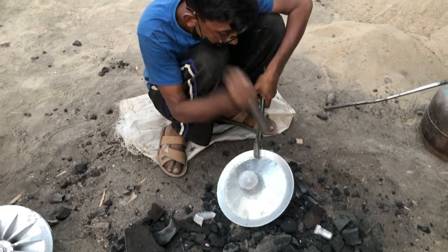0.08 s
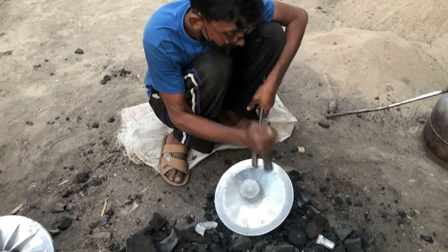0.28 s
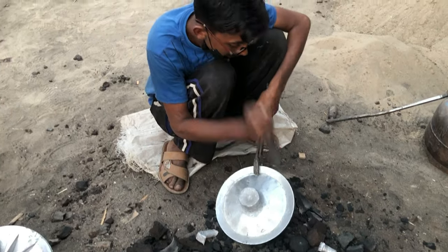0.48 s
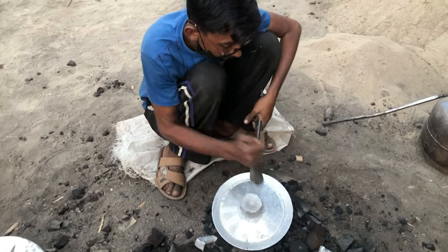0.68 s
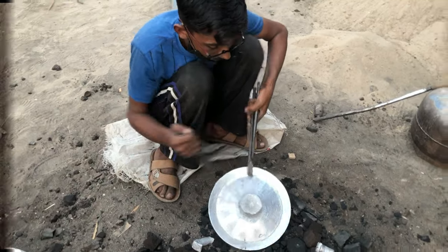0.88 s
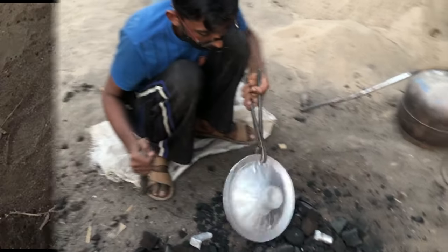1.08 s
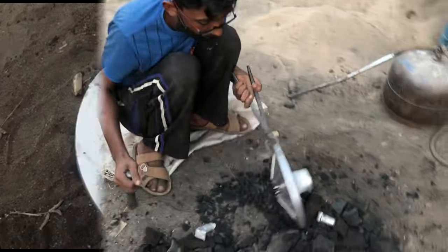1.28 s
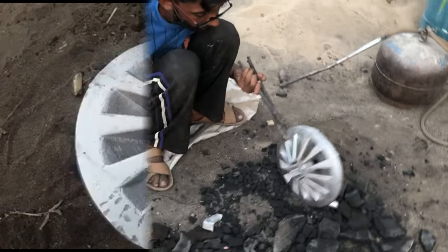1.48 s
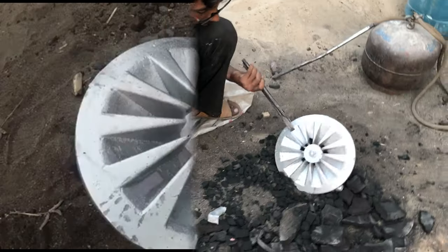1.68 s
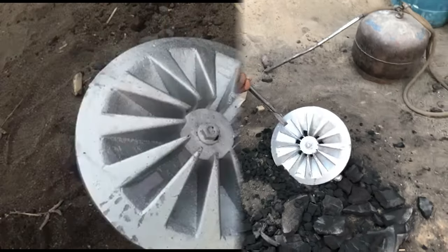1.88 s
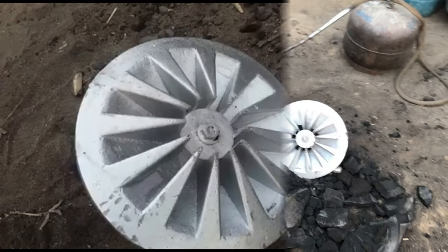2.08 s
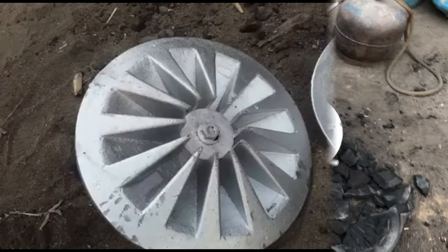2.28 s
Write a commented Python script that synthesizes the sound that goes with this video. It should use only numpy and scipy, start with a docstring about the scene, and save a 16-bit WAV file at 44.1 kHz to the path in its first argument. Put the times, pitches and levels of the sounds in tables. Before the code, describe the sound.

Two hard, bright metallic strikes on a finned aluminium casting, each with a short ring and rattle, over steady blower roar and hiss; then small coal clinks and gritty scuffs in an open yard, close microphone.

```python
"""A furnace blower roars and hisses in an open yard, then fades into duller air noise.
Over it a steel bar strikes a finned aluminium casting twice: crack, ringing modes, rattle, wall echoes.
Coals clink as single decaying modes; the casting scuffs gritty ground as short noise bursts.
A fast gain control ducks everything at each blow."""
import sys
import numpy as np
from scipy import signal
from scipy.fft import rfft, irfft
from scipy.io import wavfile
from scipy.ndimage import uniform_filter1d, map_coordinates

SR = 44100
rng = np.random.default_rng(int(sys.argv[2]) if len(sys.argv) > 2 else 0)


def wrap_up_sound(samples):
    """Save the sound to the file named by the first command line argument, as 16-bit audio."""
    columns = np.atleast_2d(samples).T
    # keep every value between -1 and 1, then stretch to whole-number steps
    tamed = np.clip(columns, -1, 1)
    steps = np.round(tamed * 32767).astype(np.int16)
    wavfile.write(sys.argv[1], SR, steps)


def amplitude_ratio(level_db):
    """Convert a level in decibels to the matching linear amplitude (field) ratio."""
    exponent = np.asarray(level_db, float) / 20
    return 10 ** exponent


N = 105840  # samples, 2.4 s


def unit(x):
    """Scales to rms 1."""
    return x / np.sqrt(np.mean(x ** 2) + 1e-20)


def along(points, hz):
    """Interpolates (Hz, value) points on a log frequency axis."""
    point_hz, value = np.transpose(points)
    return np.interp(np.log(hz + 1), np.log(point_hz + 1), value)


def curve(rows):
    """Interpolates (s, value) rows to one value per sample."""
    row_s, value = np.transpose(rows)
    return np.interp(np.arange(N) / SR, row_s, value)


def wobble(rate_hz):
    """Smooth random curve with rate_hz knots a second."""
    knots = rng.standard_normal(int(N * rate_hz / SR) + 4)
    return map_coordinates(knots, [np.arange(N) * rate_hz / SR])


def coloured(size, gain):
    """Noise of rms 1, shaped by a gain over frequency."""
    spectrum = rfft(rng.standard_normal(size))
    return unit(irfft(spectrum * gain(np.fft.rfftfreq(size, 1 / SR)), size))


def rush(spectrum, patchy_db):
    """Steady noise with time-frequency patches of random gain, rms 1."""
    noise = coloured(N + 1024, lambda hz: amplitude_ratio(along(spectrum, hz)))
    z = signal.stft(noise, nperseg=512)[2]
    field = uniform_filter1d(rng.standard_normal(z.shape), size=6, axis=0)
    field = uniform_filter1d(field, size=10, axis=1)
    patched = signal.istft(z * amplitude_ratio(patchy_db * unit(field)), nperseg=512)[1]
    return unit(patched[:N])


# flame roar level: time_s, level_db
ROAR_LEVEL = [(0.0, -35), (0.15, -34.5), (0.29, -36.5), (0.86, -37), (1.32, -33), (1.94, -36.5),
              (2.03, -35.5), (2.24, -39.5), (2.4, -47)]
# flame roar spectrum: freq_hz, relative_db (per Hz)
ROAR_SPECTRUM = [(15, -68), (25, -40), (70, -8.5), (113, -8.5), (194, -0.5), (271, -1.5), (339, -11.5),
                 (448, -22), (494, -16.5), (700, -21.5), (910, -42), (1540, -120)]


def flame_roar():
    """Low combustion noise with a lumpy level."""
    level_db = curve(ROAR_LEVEL) + 0.54 * wobble(25.23)
    return amplitude_ratio(level_db) * rush(ROAR_SPECTRUM, patchy_db=-0.3)


# blower hiss level: time_s, level_db
HISS_LEVEL = [(0.0, -44.5), (0.14, -44), (0.45, -43), (1.04, -43.5), (1.28, -42.5), (1.84, -42),
              (2.08, -45.5), (2.4, -53)]
# blower hiss spectrum: freq_hz, relative_db (per Hz)
HISS_SPECTRUM = [(350, 0), (600, -3.5), (758, -5), (1030, -6), (1160, -9), (1230, -10), (1330, -8),
                 (1640, -7.5), (2310, -7.5), (2570, -5.5), (3430, -14.5), (4910, -16.5), (5710, -10.5),
                 (7020, -18.5), (7620, -18.5), (13000, -32.5), (16000, -39)]


def air_hiss():
    """Broad turbulent noise of the blown air."""
    level_db = curve(HISS_LEVEL) + 0.38 * wobble(7.57)
    return amplitude_ratio(level_db) * rush(HISS_SPECTRUM, patchy_db=0.75)


# air in a quieter corner of the yard: freq_hz, relative_db (per Hz)
AIR_SPECTRUM = [(200, -21), (400, 11), (900, 2), (1500, -3), (3000, -12), (6000, -30), (12000, -39)]


def yard_air():
    """Dull air noise that comes up late, as roar and hiss fade."""
    level_db, from_s, full_s = -48, 2, 2.02
    fade_in = curve([(from_s, 0), (full_s, 1)])
    return amplitude_ratio(level_db) * fade_in * rush(AIR_SPECTRUM, patchy_db=1.5)


# small coal clinks: start_s, level_db, pitch_hz, t60_s
CLINKS = [(1.075, -36.5, 2870, 0.061), (1.084, -39.5, 8750, 0.043), (1.13, -56, 10600, .05),
          (1.66, -53, 12500, .06), (1.952, -43, 3000, .04), (1.96, -34.5, 1930, 0.04),
          (2.04, -35.5, 873, .06), (2.146, -37, 1030, 0.12), (2.223, -41.5, 4750, 0.066),
          (2.223, -42, 5780, .04), (2.224, -46, 8460, 0.045), (2.226, -44.5, 9300, 0.056),
          (2.33, -39.5, 1350, 0.13), (2.35, -39, 851, 0.13)]


def coal_clinks():
    """Each clink is one exponentially decaying mode."""
    attack_s = 0.0021
    out, t = np.zeros(N + SR), np.arange(SR // 4) / SR
    for start_s, level_db, pitch_hz, t60_s in CLINKS:
        envelope = amplitude_ratio(level_db - 60 * t / t60_s) * (1 - np.exp(-t / attack_s))
        out[round(start_s * SR):][:len(t)] += envelope * np.sin(2 * np.pi * pitch_hz * t)
    return out[:N]


# scuffs on grit: start_s, length_s, level_db, centre_hz
SCUFFS = [(0.205, 0.0091, -40.5, 3960), (1.055, 0.1, -49.5, 4050), (1.127, 0.061, -43.5, 830),
          (1.166, 0.13, -56, 8900), (1.17, 0.077, -45.5, 2200), (1.899, 0.053, -42, 1850),
          (1.944, 0.045, -43, 2720), (2.024, .04, -46.5, 980), (2.07, 0.036, -55, 1100),
          (2.105, 0.11, -41.5, 874), (2.2193, .03, -45, 5400), (2.22, 0.033, -46.5, 2800),
          (2.224, 0.094, -43, 1410), (2.24, .06, -52.5, 6600), (2.322, 0.061, -48, 1200)]


def grit_scuffs():
    """Sliding contact: short band-limited noise bursts with a grainy level."""
    width_octaves, top_hz, grit_db, grit_hz = 0.67, 10600, 3, 401
    out, t = np.zeros(N + SR), np.arange(SR // 4) / SR
    for start_s, length_s, level_db, centre_hz in SCUFFS:
        def band(hz):
            octaves = np.log2((hz + 1) / centre_hz)
            return np.exp(-.5 * (octaves / width_octaves) ** 2 - (hz / top_hz) ** 4)

        u = t / length_s
        grit = coloured(len(t), band) * amplitude_ratio(grit_db * wobble(grit_hz)[:len(t)])
        envelope = (1 - np.exp(-u / 0.093)) * np.exp(-3 * u ** 2)
        out[round(start_s * SR):][:len(t)] += amplitude_ratio(level_db) * envelope * grit
    return out[:N]


# diffuse yard decay: freq_hz, t60_s
YARD_DECAY = [(500, 0.6), (2000, 0.56), (10000, 0.17)]
# wall echoes: delay_s, level_db
WALLS = [(0.0273, -13.5), (.05, -24)]


def yard(x):
    """Adds smeared, dull wall echoes and a diffuse tail, each frequency dying at its own speed."""
    tail_db, tail_from_s = -17, 0.013
    wall_smear_s, wall_top_hz = 0.0018, 7100
    hz, t, z = signal.stft(rng.standard_normal(SR // 2), SR, nperseg=256)
    decay = amplitude_ratio(-60 * t / along(YARD_DECAY, hz)[:, None])
    tail = signal.istft(z * decay, SR, nperseg=256)[1]
    tail = amplitude_ratio(tail_db) * tail / np.linalg.norm(tail)
    tail = np.pad(tail, (round(tail_from_s * SR), 0))
    t = np.arange(SR // 20) / SR
    for delay_s, level_db in WALLS:
        echo = coloured(len(t), lambda hz: 1 / (1 + (hz / wall_top_hz) ** 2))
        echo *= np.exp(-t / wall_smear_s)
        tail[round(delay_s * SR):][:len(t)] += amplitude_ratio(level_db) * echo / np.linalg.norm(echo)
    return x + signal.fftconvolve(x, tail)[:len(x)]


# fins and grit shaking: freq_hz, relative_db (per Hz)
RATTLE_SPECTRUM = [(300, -16), (500, -8.5), (750, 0), (1300, -6), (2500, -1), (4300, -6.5), (6200, -14.5),
                   (8000, -11.5), (12500, -19.5), (15500, -39), (17000, -60)]


def rattle(t, fins_db):
    """Dying noise of shaking fins and grit, passed through many small fin modes."""
    level_db, t60_s, fin_spacing_hz = -14.5, 0.13, 45

    def fin_gain(hz):
        peaks_db = np.interp(hz / fin_spacing_hz, np.arange(len(fins_db)), fins_db)
        return amplitude_ratio(along(RATTLE_SPECTRUM, hz) + peaks_db)

    envelope = amplitude_ratio(level_db - 60 * t / t60_s + 3.8 * wobble(321)[:len(t)])
    return envelope * coloured(len(t), fin_gain)


# impact crack: freq_hz, relative_db (per Hz)
CRACK_SPECTRUM = [(240, -64), (400, -5), (1270, 3), (1760, -15), (3120, -4.5), (4380, -1), (5270, 0.5),
                  (6640, -32), (11000, -14), (16000, -34)]


def crack(t):
    """Short broadband contact noise."""
    level_db, t60_s, rise_s = -11.5, 0.031, 0.0018
    envelope = amplitude_ratio(level_db - 60 * t / t60_s) * (1 - np.exp(-t / rise_s))
    return envelope * coloured(len(t), lambda hz: amplitude_ratio(along(CRACK_SPECTRUM, hz)))


# casting and bar modes: pitch_hz, t60_s, first_spot_db, second_spot_db (relative)
METAL_MODES = [(668, .09, -27, -30), (1306, 0.13, -27, -12.5), (1772, 0.26, -10, -9),
               (1800.5, 0.16, 0, 1.5), (1789, 1.1, -28.5, -23), (1802, 0.97, -28, -17.5),
               (1866, 0.13, -10.5, -5), (2508, 0.26, -11, -9.5), (2550, 0.93, -22.5, -23.5),
               (2725, 0.067, -9, -11), (3543, 0.15, -6, -12), (3582, 0.63, -28, -27),
               (3666, 0.11, -10, -14), (4190, 0.26, -16, -26), (4296, 0.11, -5.5, -9.5),
               (4560, .1, -11, -21), (5145, 0.12, -7, -11), (5060, .09, -29, -28), (5640, 0.11, -19, -28),
               (7400, 0.19, -30, -19), (7580, 0.17, -37, -19.5), (8651, 0.14, -21, -14),
               (10890, 0.16, -16.5, -10), (12000, .1, -18, -26), (12700, 0.066, -35, -15.5)]


def metal_ring(t, spot):
    """Decaying modes, weighted by the spot struck; each wavers as the casting rocks on loose coals."""
    ring_db, attack_s = -16, 0.0011
    burst_db, burst_t60_s = 6.5, 0.062  # louder start while the bar is in contact
    rough, rough_hz = .7, 65
    knot = np.arange(100)
    ring = np.zeros(len(t))
    for pitch_hz, t60_s, *spot_db in METAL_MODES:
        knots = rng.standard_normal((2, 100)) * np.minimum(knot, 1)  # waver starts from zero
        in_phase, quadrature = [rough * np.interp(t * rough_hz, knot, k) for k in knots]
        phase = 2 * np.pi * (pitch_hz * t + rng.random())
        wavering = (1 + in_phase) * np.sin(phase) + quadrature * np.cos(phase)
        ring += amplitude_ratio(spot_db[spot] - 60 * t / t60_s) * wavering
    burst = 1 + amplitude_ratio(burst_db - 60 * t / burst_t60_s)
    return ring * amplitude_ratio(ring_db) * (1 - np.exp(-t / attack_s)) * burst


# bar blows, one per spot: start_s, level_db
BLOWS = [(.2266, 0.5), (.6062, -1.65)]


def bar_blows():
    """Each blow sums ring, crack and rattle, and the yard answers; both blows share the fin modes."""
    size = SR * 3 // 4
    out, t = np.zeros(N + size), np.arange(size) / SR
    fins_db = 3.5 * rng.standard_normal(1000)
    for spot, (start_s, level_db) in enumerate(BLOWS):
        blow = metal_ring(t, spot) + crack(t) + rattle(t, fins_db)
        out[round(start_s * SR):][:size] += amplitude_ratio(level_db) * yard(blow)
    return out[:N]


def scene():
    """All sources at one microphone."""
    background = flame_roar() + air_hiss() + yard_air()
    ground = coal_clinks() + grit_scuffs()
    return (background + ground + bar_blows())[None]


def low_pass(x):
    """Removes everything above the highest recorded frequency."""
    return signal.sosfilt(signal.butter(12, 16510, fs=SR, output="sos"), x)


def record(dry):
    """Gain control from the lagging power, a soft ceiling, then the band limits."""
    duck_from_db, duck_slope, duck_lag_s = -20, 1.15, .0045  # slope: dB cut per dB over
    ceiling, low_cut_hz, top_hz = .9, 46, 15900
    pole = np.exp(-1 / (duck_lag_s * SR))
    power = signal.lfilter([(1 - pole) ** 2], [1, -2 * pole, pole ** 2], dry ** 2)
    over_db = np.maximum(10 * np.log10(np.abs(power) + 1e-12) - duck_from_db, 0)
    held = dry * amplitude_ratio(-duck_slope * over_db)
    held = held / (1 + np.abs(held / ceiling) ** 4) ** .25
    hz = np.fft.rfftfreq(N, 1 / SR)
    band = (hz < top_hz) * hz ** 2 / (hz ** 2 + low_cut_hz ** 2)
    mix = irfft(rfft(held) * band, N)
    return low_pass(mix)


dry = scene()
out = record(dry)
wrap_up_sound(out)
```